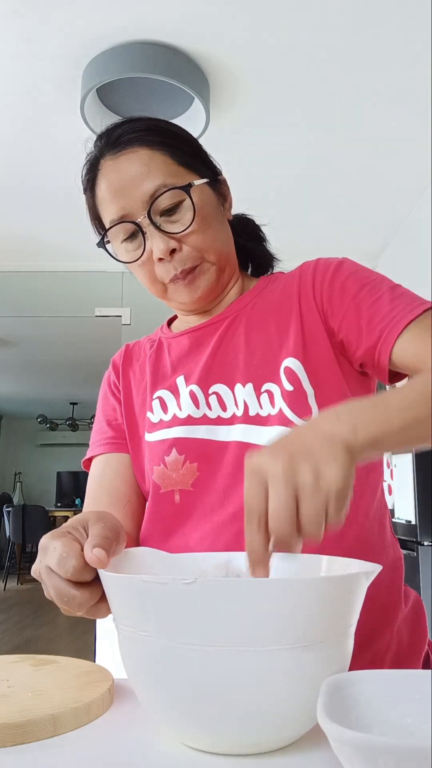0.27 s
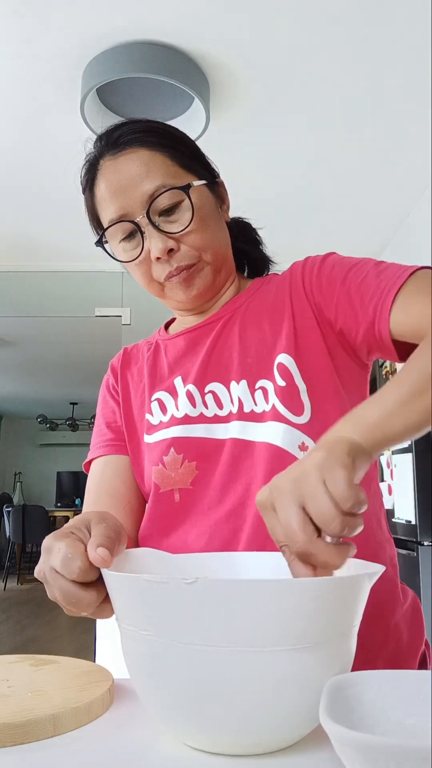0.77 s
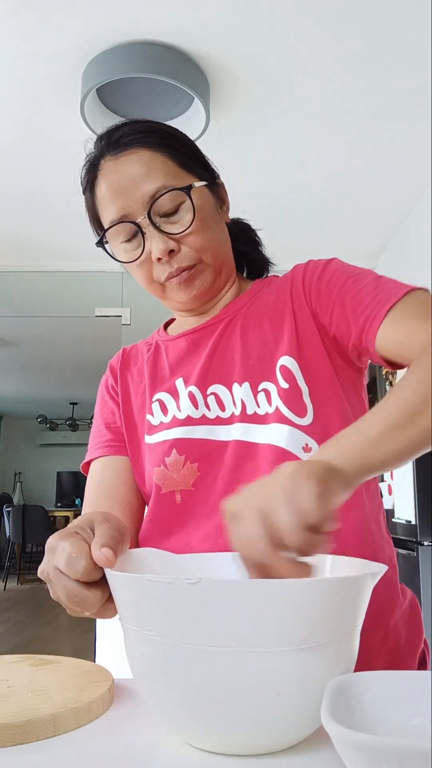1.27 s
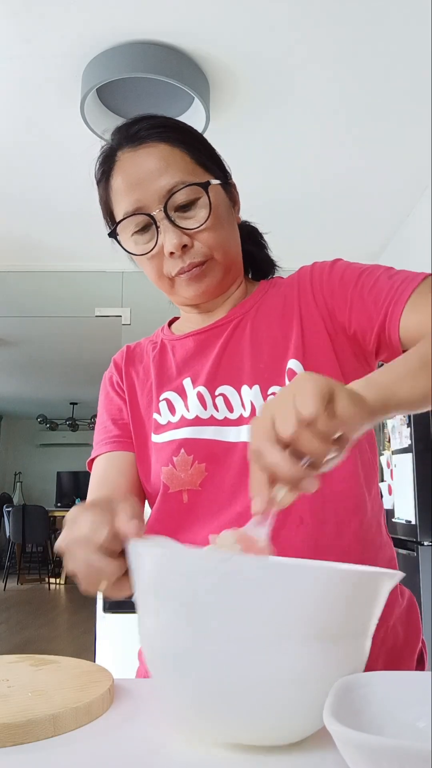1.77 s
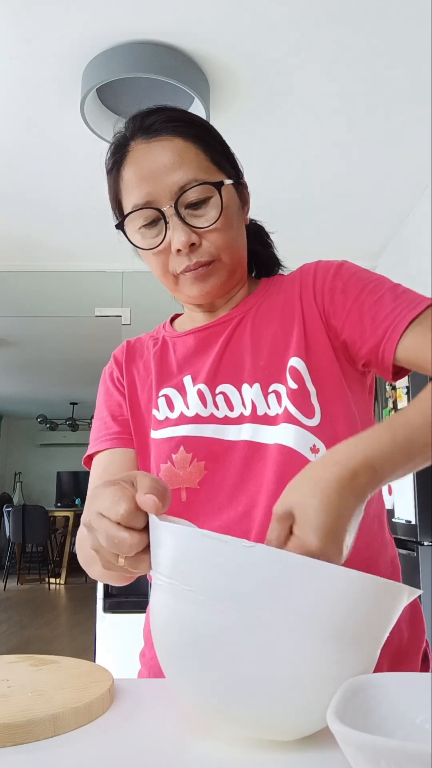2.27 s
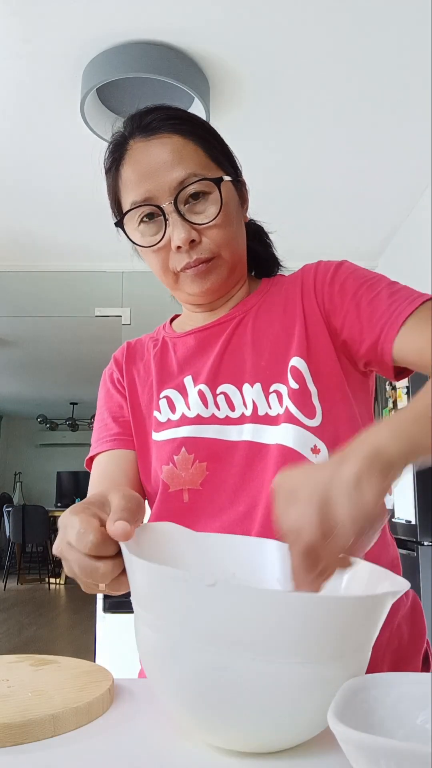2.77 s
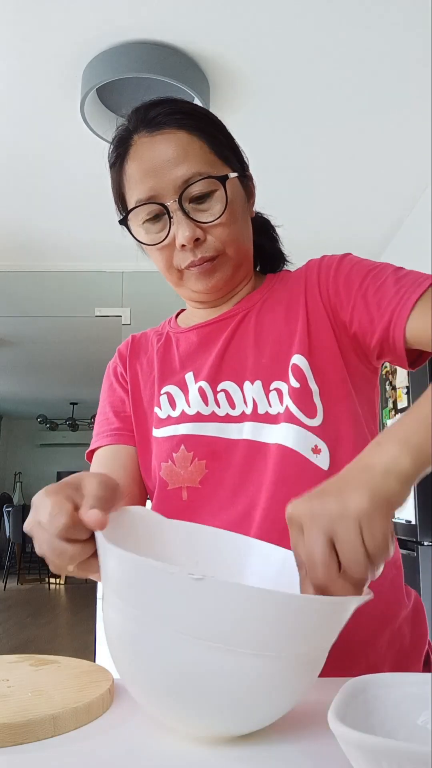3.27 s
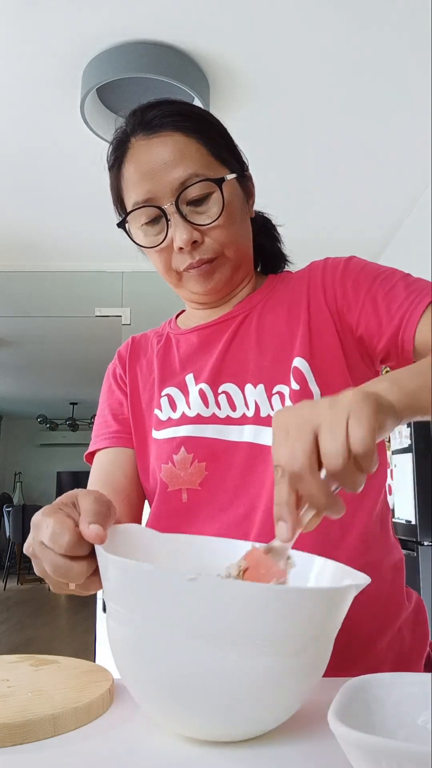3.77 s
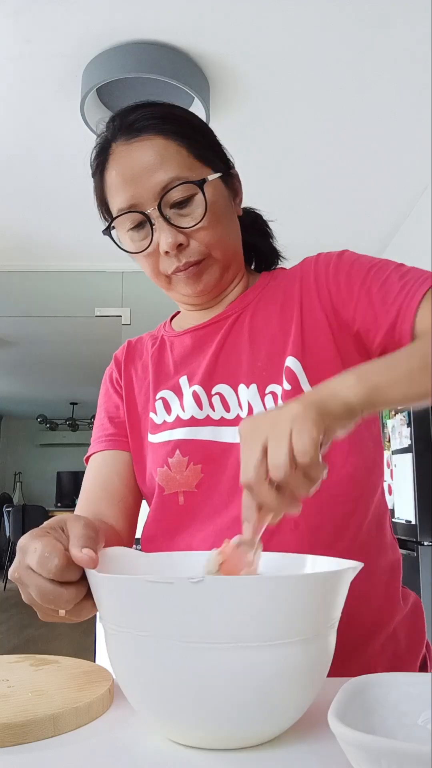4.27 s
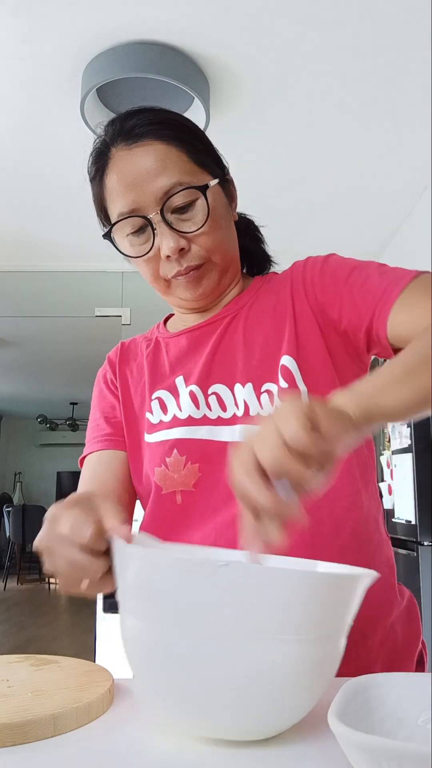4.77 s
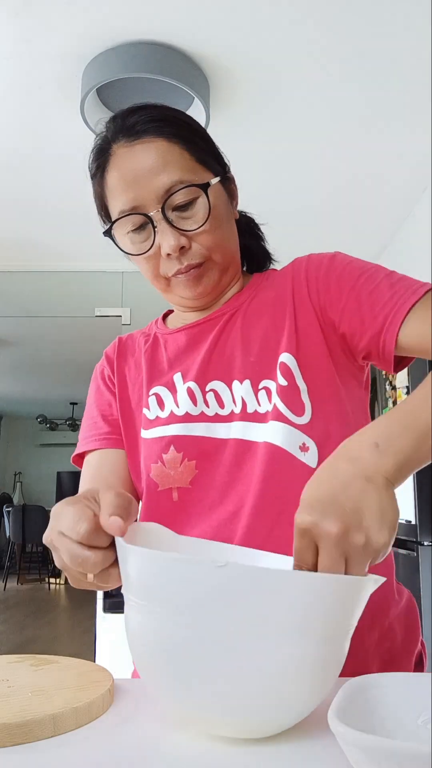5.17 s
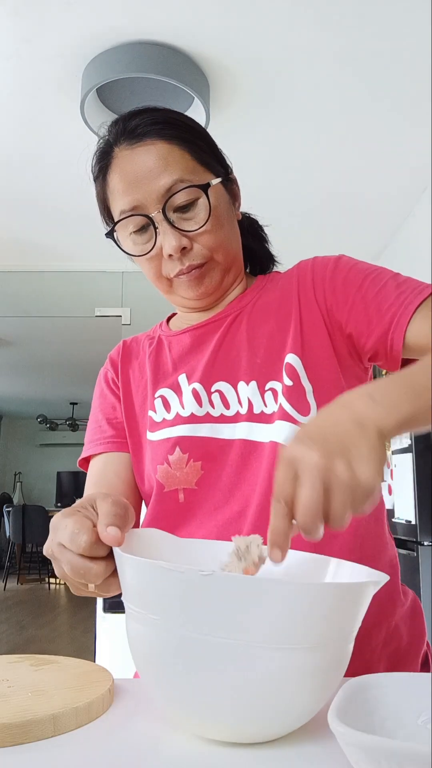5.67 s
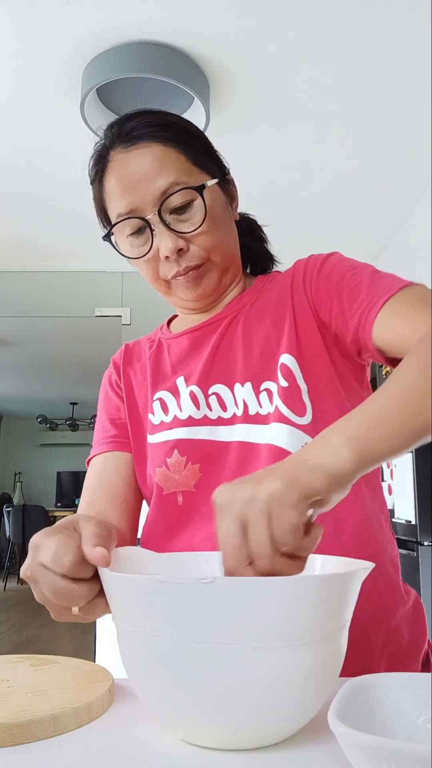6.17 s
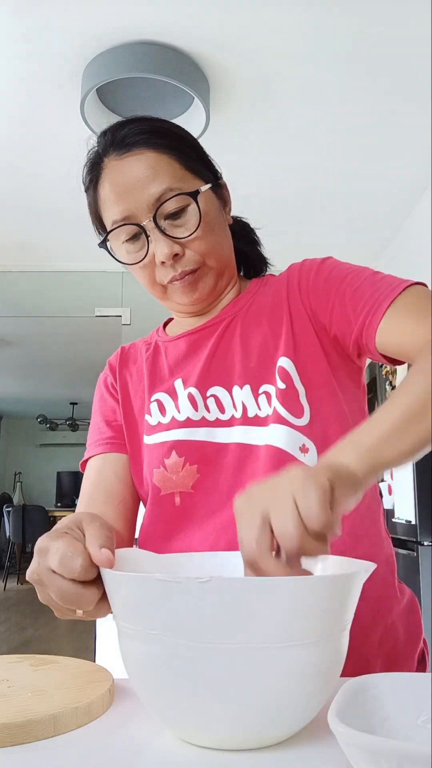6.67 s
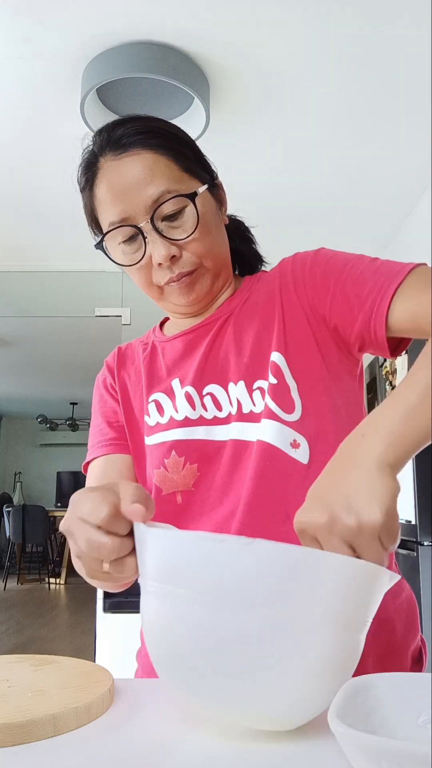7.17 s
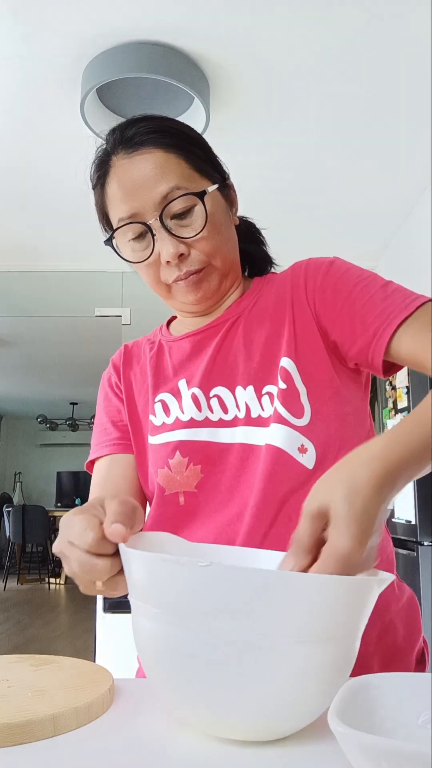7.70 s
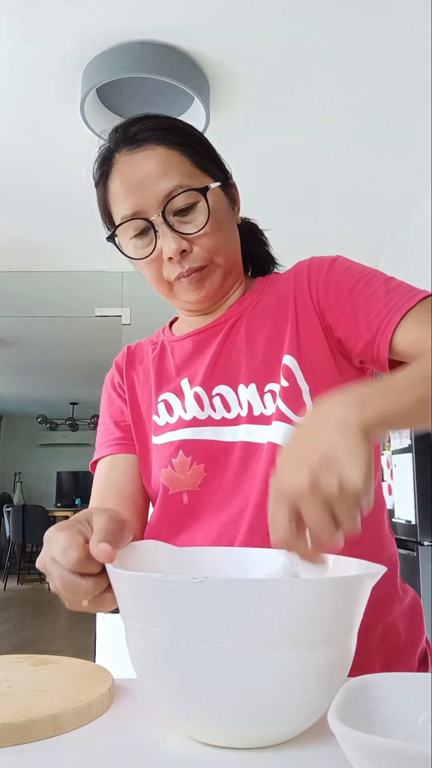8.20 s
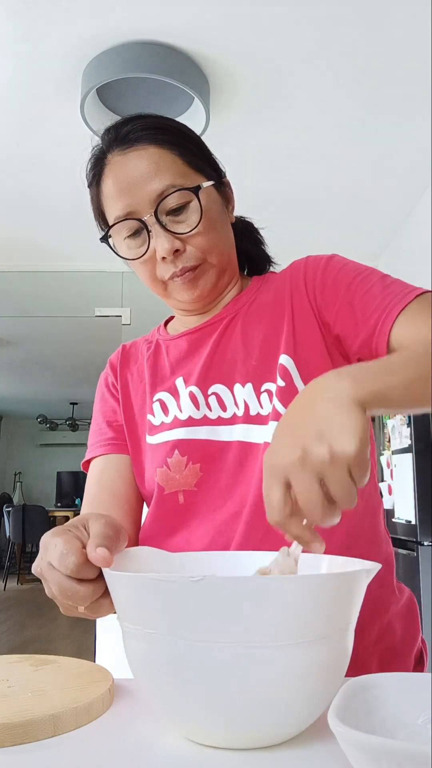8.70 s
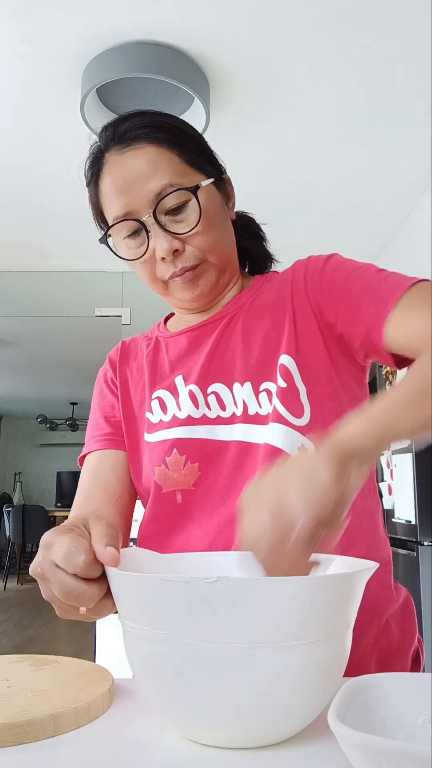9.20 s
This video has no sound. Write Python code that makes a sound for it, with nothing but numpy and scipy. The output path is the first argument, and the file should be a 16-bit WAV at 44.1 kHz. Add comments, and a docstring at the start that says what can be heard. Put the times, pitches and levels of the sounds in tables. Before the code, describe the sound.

A blade drags stiff, crumbly dough along a plastic bowl from the very start, in short gritty scrapes with a crisp hiss. Sharp hollow taps and a few dull thuds punctuate the strokes, while the bowl shifts with low murmurs on the counter. Tiny faint squeaks appear later. A low appliance hum continues under it all. Close stereo microphone, small kitchen with a short tail.

```python
"""A spatula stirs stiff, crumbly dough in a plastic bowl on a kitchen counter, close to a two-port microphone.
Throughout, an appliance hums in sine tones over faint filtered-noise air; the bowl's shifts murmur from the start.
The first stroke comes at once: each is a dense rush of tiny random slips that ring the bowl wall.
Sharp taps soon join, then dull thuds, both short rings of the wall; from about 3 s brief noise squeaks appear.
The stirring goes on past 9 s, and random echoes with a short kitchen tail follow strokes, taps and thuds."""
import sys
import numpy as np
from scipy import signal
from scipy.fft import rfft, irfft, next_fast_len
from scipy.io import wavfile
from scipy.ndimage import uniform_filter1d, minimum_filter1d, map_coordinates

SR = 44100
rng = np.random.default_rng(int(sys.argv[2]) if len(sys.argv) > 2 else 0)


def master(y):
    """Save y as 16-bit WAV."""
    cut = np.clip(np.atleast_2d(y).T, -1, 1)
    pcm = np.round(cut * 32767)  # scale
    wavfile.write(sys.argv[1], SR, pcm.astype(np.int16))


N = 416304  # length in samples

# Steady tones of the appliance. Each row: pitch in Hz, middle level in dB.
HUM_TONES = [(59.9, -48), (119.9, -45.5), (199.6, -55), (240, -71.5)]
# Resonances of the low murmur. Each row: pitch in Hz, width in Hz, level in dB.
COUNTER_RESONANCES = [(78, 30, -20.5), (116, 11, 5), (175, 99, -1.5), (195, 11, 1.5), (243.6, 11, 6.5),
                      (311, 55, -8.5)]
# The bowl shifts on the counter. Each row: middle in seconds, half length in seconds, level in dB.
BOWL_SHIFTS = [(0.31, 0.093, -38.5), (0.66, 0.046, -37), (1.05, .06, -38), (1.43, 0.1, -41),
               (1.8, 0.056, -39), (2.19, 0.16, -42.5), (2.66, 0.073, -39), (2.89, 0.053, -39),
               (3.3, 0.075, -41), (3.6, 0.12, -42), (4.41, 0.033, -47.5), (5.02, 0.074, -39.5),
               (5.58, 0.04, -46), (5.89, 0.094, -42.5), (6.39, .06, -46), (6.82, 0.27, -48.5),
               (7.22, 0.023, -39.5), (7.7, 0.18, -46.5), (9.14, 0.056, -46)]
# Tone colours of the steady rumble and the air. Each row: frequency in Hz, relative level in dB.
RUMBLE_COLOUR = [(15, -25), (40, 0), (70, -10), (120, 7), (200, -4), (280, -23.5), (500, -60)]
AIR_COLOUR = [(200, -20), (300, -1.5), (480, -7.5), (700, -11), (1000, -19), (2000, -23.5), (4000, -31.5),
              (10000, -35.5), (15000, -51.5)]

# Dough and bowl thud down. Each row: start in seconds, peak before echoes in dB, depth in dB,
# hollow knock in dB, rebound in dB relative to the first landing.
THUD_EVENTS = [(0.623, -17.5, -1, 5, -5.5), (0.993, -27, -28, -7.5, -23), (1.373, -28, -7, 3, 3.5),
               (1.672, -1.5, -13.5, 6.5, -18), (2.599, -25, -14, -7, -4), (3.162, -27.5, 18, -22.5, -0.5),
               (3.9145, -11, 13, 1.5, -13), (4.608, -29.5, 15.5, -10, -7), (5.951, -20.5, 10.5, -2, -8.5)]
# The blade chatters in a squeak. Each row: middle in seconds, half length in seconds, pitch in Hz,
# level in dB before its swell.
SQUEAK_EVENTS = [(3.273, 0.017, 2570, -37.5), (3.415, 0.021, 805, -56.5), (4.319, 0.026, 4080, -51),
                 (5.192, 0.031, 2710, -58), (5.27, .03, 2970, -62), (5.415, 0.02, 2640, -53.5),
                 (6.386, 0.011, 4370, -47), (7.576, 0.022, 2740, -42.5), (8.091, 0.017, 1310, -60.5),
                 (8.396, 0.017, 756, -50)]
# The spatula taps the bowl. Each row: start in seconds, peak before echoes in dB, body in dB, edge in dB,
# frequency of the brightest band in Hz.
TAP_EVENTS = [(0.1434, -14.5, -1, -28, 1850), (0.2358, -4.5, 9, 1.5, 1880), (0.2627, -2, -0.5, 6.5, 2850),
              (0.5293, -18, 14.5, -25.5, 2650), (0.9565, -19.5, 17.5, 11.5, 1670),
              (0.9927, -25, 17.5, -16, 1640), (1.3755, -31.5, -1, 1, 1580), (1.6413, -26.5, 4, 10, 1922),
              (2.069, -19, 0, 27.5, 1180), (2.2794, -29.5, -4, 13.5, 1790), (2.4213, -7, -27.5, 9, 1890),
              (2.4267, -6, -34, 3.5, 3800), (2.5016, -25.5, -14.5, 3.5, 2140),
              (2.5975, -18.5, 8, 6.5, 1650), (2.992, -18, -28, 5, 2570), (3.493, -8, -0.5, -8, 1980),
              (3.5851, -15.5, 0, -1.5, 1590), (3.6627, -5.5, 8.5, -4.5, 1640), (3.707, -6, 1.5, -1, 2630),
              (3.9443, -22, 4, 2.5, 3200), (4.071, -22, 10.5, -34, 1550), (4.103, -14.5, -1.5, 5, 2570),
              (5.5718, -27, 10, 4.5, 2950), (5.5996, -21.5, -2.5, 15, 2980), (5.7877, 1, -4.5, 4.5, 3250),
              (6.152, -30.5, 12, -10, 2210), (6.2303, -30.5, -11, -18.5, 2580),
              (6.3115, -23.5, -24, -2.5, 2020), (6.8883, -18, 5, 6, 1580), (7.5462, -20.5, 2, -1.5, 2920),
              (7.673, -26, -35, 7, 1880), (7.7237, -14.5, -30, 0.5, 3020)]
# Strokes of the blade along the wall. Each row: start in seconds, attack in seconds, length in seconds,
# scrape level in dB, crumb hiss level in dB, scrape's fade over the stroke in dB.
BLADE_STROKES = [(0.0, 0.0033, 0.13, -39, -42.5, 5), (0.272, 0.092, 0.21, -41, -45, 2),
                 (0.538, 0.051, 0.19, -39, -46.5, 1), (0.775, 0.031, 0.081, -40, -45, 0.5),
                 (0.922, .025, 0.068, -46, -54, 0.5), (0.999, .055, 0.23, -38, -44, 5),
                 (1.363, .03, 0.042, -53, -65, 8.5), (1.631, 0.047, 0.08, -33, -35, 2),
                 (1.715, .04, 0.5, -41, -43, 5), (2.603, 0.072, 0.072, -42, -48.5, 4),
                 (2.985, .045, 0.12, -43, -40, 0), (3.088, .05, 0.19, -36.5, -40, 5.5),
                 (3.397, 0.011, 0.043, -60, -68.5, 4), (3.501, .02, 0.072, -48.5, -67.5, 2.5),
                 (3.682, 0.061, 0.17, -39.5, -42.5, 2.5), (3.915, .03, .09, -48.5, -64.5, 3),
                 (4.097, 0.021, 0.052, -32.5, -44, 4), (4.195, 0.11, 0.11, -45.5, -57.5, -1.5),
                 (4.603, 0.026, 0.35, -40.5, -41, 1.5), (4.936, 0.04, 0.19, -44, -49, 5),
                 (5.16, .04, 0.12, -59, -66, 0), (5.364, 0.038, 0.057, -60.5, -65.5, 3.5),
                 (5.589, 0.033, 0.041, -37, -58, 4), (5.781, .04, 0.17, -38.5, -41.5, 2),
                 (6.139, .02, 0.31, -54.5, -60.5, 3.5), (6.333, 0.17, 0.11, -40, -53.5, 1),
                 (6.718, .13, 0.83, -36, -37, 9), (7.799, 0.026, 0.04, -34, -42.5, 1),
                 (7.893, .03, 0.1, -50.5, -62, 2), (8.219, 0.076, .08, -49, -58.5, 4.5),
                 (8.362, .03, .05, -65, -68, 2.5), (8.925, .012, 0.029, -52.5, -52.5, 0.5),
                 (8.977, 0.031, 0.31, -35.5, -35.5, 11.5), (9.392, 0.032, 0.038, -56, -65.5, 2)]
# The blade presses a lump of dough on the wall. Each row: middle in seconds, half length in seconds, level in dB.
DOUGH_FOLDS = [(0.03, 0.073, -46), (0.33, 0.013, -45.5), (0.63, 0.05, -38), (0.72, 0.061, -46.5),
               (1.0, 0.054, -47), (1.09, 0.1, -46), (1.425, 0.024, -51.5), (1.705, .03, -39.5),
               (1.93, 0.15, -53.5), (2.13, 0.084, -52.5), (2.665, 0.017, -41), (3.17, 0.038, -48.5),
               (3.27, 0.024, -48), (3.75, .02, -50), (3.985, .03, -50.5), (4.15, 0.015, -40.5),
               (4.325, 0.035, -45), (4.81, 0.045, -47), (5.03, 0.11, -55), (6.18, 0.017, -51.5),
               (6.28, 0.041, -50.5), (6.415, 0.032, -46.5), (6.905, 0.034, -40), (7.05, 0.15, -45),
               (7.31, 0.041, -47.5), (7.72, 0.014, -47), (7.86, 0.021, -54), (8.3, 0.026, -63),
               (9.015, .015, -33), (9.065, 0.041, -41.5), (9.19, 0.094, -50.5)]

# Ways the bowl wall rings. Each row: pitch in Hz, width in Hz, lift in dB for a pressed wall.
BOWL_MODES = [(120.5, 12, 6.5), (410, 5, 6.5), (512, 20, 4.5), (600, 6, 4.5), (635, 4.2, 8), (889, 5.8, 5),
              (1125, 8.1, 6.5), (1173, 16, 7), (1278, 93, 7), (1601, 42, 5.5), (1700, 170, 4),
              (2022, 19, 7.5), (2630, 160, 3), (2930, 25, 4), (3176, 8.3, 3.5), (3916, 19, 1)]
# Tone colours of the contacts, before the bowl's ringing. Each row: frequency in Hz, relative level in dB.
SCRAPE_COLOUR = [(800, -37.5), (1400, -10.5), (1900, 1.5), (2300, 0.5), (2800, 1.5), (4400, -2), (5400, -9),
                 (7000, -40.5)]
BODY_COLOUR = [(200, -22), (330, -2), (480, -8.5), (700, 8), (850, 11.5), (1030, -3), (1350, 1.5),
               (1800, -4), (2600, -39)]
HISS_COLOUR = [(4200, -27.5), (5600, -1.5), (6800, -2), (8000, -6), (10400, -3.5), (11500, -14),
               (13000, -20.5), (15500, -28.5)]
TAP_COLOUR = [(150, -32), (420, -17.5), (650, -2), (1000, 0), (1400, -4), (1800, 3.5), (3000, 1.5),
              (4200, -0.5), (5500, -9.5), (10000, -18.5), (12000, -30.5), (15000, -51)]
THUD_COLOUR = [(20, -19), (50, -1), (130, 0), (200, 0.5), (300, -8.5), (430, -19), (540, -11.5),
               (780, -4.5), (1200, -23), (2000, -23), (3000, -50.5), (8000, -62)]
# How the two ports differ. Each row: frequency in Hz, left minus right in dB.
PORT_DIFFERENCE = [(60, 9), (110, 7), (200, 9.5), (380, 10), (700, 4), (1290, 7), (2380, 5.5), (4400, 1.5),
                   (8120, -0.5), (15000, -39.5)]
# The kitchen's tail. Each row: frequency in Hz, time to fall by 60 dB in seconds.
KITCHEN_DECAY = [(100, 0.24), (600, 0.33), (3000, 0.48), (7000, 0.44), (14000, 0.16)]

TOP_HZ = 15750  # upper limit of the finished sound
LAG_MS = 0.73  # the left port hears sound this much later
MURMUR_REST_DB, MURMUR_WAVER_DB = -56.5, 3  # the murmur between shifts
REBOUND_S = 0.028  # the bowl rocks back and lands a second time
REBOUND_KNOCK_DB = -6  # the second landing has less hollow knock
THUD_LEFT_DB = 2  # the bowl's foot is nearer the left port
DRAG_DB = -16.5  # dough body that every stroke carries, relative to its scrape
RELEASE_DB_PER_S, HISS_RELEASE_DB_PER_S = 215, 209.5  # dying away as the blade leaves the wall
HISS_FADE = 1.83  # the crumbs fade this many times as far in dB as the scrape
HISS_BITE = 0.8  # the crumbs break loose within this share of a stroke's attack


def amp(db):
    """Turn decibels into a gain."""
    return 10 ** (np.asarray(db) / 20)


def unit(x):
    """Scale to an average (rms) level of 1."""
    return x / np.sqrt(np.mean(x ** 2) + 1e-20)


def along(points, hz):
    """Read a value between (Hz, value) points, with frequency on a log axis."""
    f, v = np.transpose(points)
    return np.interp(np.log(hz + 1), np.log(f), v)


def wobble(rate):
    """Draw a smooth random curve through this many random points a second."""
    knots = rng.standard_normal(int(N * rate / SR) + 4)
    return map_coordinates(knots, [np.arange(N) * rate / SR])


def filtered(x, response):
    """Multiply the spectrum of x by a response to frequency."""
    m = next_fast_len(x.shape[-1] + SR // 4)
    hz = np.fft.rfftfreq(m, 1 / SR)
    return irfft(rfft(x, m) * response(hz), m)[..., :x.shape[-1]]


def add(track, s, sound):
    """Mix a sound into a track at time s in seconds."""
    part = track[:, max(round(s * SR), 0):][:, :sound.shape[-1]]
    part += sound[:, :part.shape[-1]]


def swells(rows):
    """Add up the power of bell-shaped pushes."""
    t = np.arange(N) / SR
    return sum(amp(db) ** 2 * np.exp(-np.minimum(((t - s) / half) ** 2, 20)) for s, half, db in rows)


def ports(x):
    """The left port hears more bass, the right port more of the highest treble."""
    def gains(hz):
        pair = amp(np.outer([.5, -.5], along(PORT_DIFFERENCE, hz)))
        return pair / np.sqrt(np.mean(pair ** 2, axis=0))
    return filtered(x, gains)


def paths(near_db, near_t60, room_db):
    """Direct sound (right port first), quick echoes in bowl and counter, and the kitchen's tail."""
    t = np.arange(SR // 3) / SR
    lag = round(LAG_MS * SR / 1000)

    def norm(v):
        return v / np.linalg.norm(v, axis=1, keepdims=True)
    near = rng.standard_normal((2, len(t))) * amp(-60 * t / near_t60) * (t > LAG_MS / 1000)
    # each frequency of the tail dies away at its own pace
    hz, when, z = signal.stft(rng.standard_normal((2, len(t))), SR, nperseg=256)
    decay = amp(-60 * when / along(KITCHEN_DECAY, hz)[:, None])
    tail = signal.istft(z * decay, SR, nperseg=256)[1][:, :len(t)]
    tail = tail * (1 - np.exp(-t / 0.0018))  # the tail builds up over a few milliseconds
    h = amp(near_db) * norm(near) + amp(room_db) * norm(tail)
    h[0, lag] += 1
    h[1, 0] += 1
    return h


def bowl_ring(*colours, freedom=1, size=8192):
    """The wall's answer to one contact of the given colours; a free wall rings more than a pressed one."""
    hz = np.fft.rfftfreq(size, 1 / SR)
    modes = 1 + sum((amp(db) - 1) / np.hypot(1, 2 * (hz - f) / width) ** 2 for f, width, db in BOWL_MODES)
    gain = np.abs(modes) ** freedom * amp(sum(along(c, hz) for c in colours))
    # fold the cepstrum (spectrum of the log gain) so that the ring starts at once and only decays after it
    cepstrum = irfft(np.log(gain + 1e-6))
    cepstrum[1:size // 2] *= 2
    cepstrum[size // 2 + 1:] = 0
    return irfft(np.exp(rfft(cepstrum)))


def appliance_hum():
    """Sine tones hum steadily while their levels and phases waver a little."""
    t = np.arange(N) / SR
    hum = np.zeros(N)
    for hz, db in HUM_TONES:
        level = amp(db + 2.0 * wobble(9.3)) * np.sqrt(2)
        hum += level * np.sin(2 * np.pi * (hz * t + rng.random()) + 0.053 * wobble(1.0))
    return hum


def port_noise(response, apart):
    """Shared noise plus separate noise for each port; a larger apart makes the ports less alike."""
    shared = rng.standard_normal(N)
    return unit(filtered(shared + apart * rng.standard_normal((2, N)), response))


def counter_murmur():
    """The bowl's shifts swell a low noise that is coloured by the murmur's resonances."""
    def counter(hz):
        return sum(amp(db) / (1 + (2.04 * (hz - f) / width) ** 2) for f, width, db in COUNTER_RESONANCES)
    rest = amp(MURMUR_REST_DB + MURMUR_WAVER_DB * wobble(6))
    return np.sqrt(rest ** 2 + swells(BOWL_SHIFTS)) * port_noise(counter, apart=0.09)


def room_air():
    """Steady low rumble and faint air, both made of coloured noise."""
    rumble = amp(-50.0) * port_noise(lambda hz: amp(along(RUMBLE_COLOUR, hz)), apart=0.21)
    air = amp(-64.5) * port_noise(lambda hz: amp(along(AIR_COLOUR, hz)), apart=2.6)
    return rumble + air


def background():
    """Hum, murmur and room air, all reaching the left port slightly late."""
    def delay(hz):
        return np.exp(-2j * np.pi * np.outer([LAG_MS / 1000, 0], hz))
    return filtered(appliance_hum() + counter_murmur() + room_air(), delay)


def thuds():
    """Soft heavy contacts: dough drops and the bowl rocks on the counter."""
    out = np.zeros((2, N))
    landings = [row[:4] for row in THUD_EVENTS]
    for s, db, depth_db, knock_db, back_db in THUD_EVENTS:
        landings.append((s + REBOUND_S, db + back_db, depth_db, knock_db + REBOUND_KNOCK_DB))
    low_pass = signal.butter(2, 250, fs=SR, output="sos")
    for s, db, depth_db, knock_db in landings:
        ring = bowl_ring(THUD_COLOUR, [(90, depth_db), (250, 0), (700, knock_db)], freedom=1.28)
        ring *= amp(db) / np.abs(ring).max()
        # the deep push stays in the counter; the hollow knock carries into the kitchen
        push = signal.sosfilt(low_pass, ring)
        knock = ring - push
        push_paths = paths(near_db=-10, near_t60=0.082, room_db=-5.5)
        knock_paths = paths(near_db=2, near_t60=0.064, room_db=-4.5)
        add(out, s, signal.fftconvolve(push[None], push_paths, axes=1))
        add(out, s, signal.fftconvolve(knock[None], knock_paths, axes=1))
    return out * amp(THUD_LEFT_DB * np.array([[.5], [-.5]]))


def squeaks(sharpness=11):
    """Stick and slip briefly lock on to one rough pitch, made as a narrow band of noise."""
    out, t = np.zeros((2, N)), np.arange(SR // 4) / SR
    middle = t.mean()
    for s, half, hz, db in SQUEAK_EVENTS:
        noise = rng.standard_normal((2, len(t)))
        chatter = filtered(noise, lambda f: 1 / (1 + (sharpness * (f / hz - 1)) ** 2))
        swell = np.exp(-.5 * ((t - middle) / half) ** 2)
        add(out, s - middle, amp(db) * unit(chatter) * swell)
    return out


def taps(focus_db=9, focus_octaves=0.74):
    """Hard contacts: the point of contact sets the body, the edge and the brightest band of each."""
    out = np.zeros((2, N))
    for s, db, body_db, edge_db, hz in TAP_EVENTS:
        focus = [(hz / 2 ** focus_octaves, 0), (hz, focus_db), (hz * 2 ** focus_octaves, 0)]
        balance = [(800, body_db), (1700, 0.001), (3500, 0.0086), (6000, edge_db)]
        ring = bowl_ring(TAP_COLOUR, focus, balance)
        ring /= np.abs(ring).max()
        # the rim is in plain view of the microphone, so the direct crack is strong
        echoes = paths(near_db=-1, near_t60=.035, room_db=-4.5)
        add(out, s, amp(db) * signal.fftconvolve(ring[None], echoes, axes=1))
    return out


def friction(colour, rate, spread_db, room_db, patchy_db, size=4096):
    """Tiny slips of scattered size, about rate a second, ring the wall; the result has rms 1."""
    happens = rng.random(N) < rate / SR
    strength = rng.standard_normal(N) * amp(spread_db * np.clip(rng.standard_normal(N), -2, 2))
    rub = signal.fftconvolve(happens * strength, bowl_ring(colour))[:N]
    # the travelling contact favours now some resonances, now others
    z = signal.stft(rub, nperseg=1024)[2]
    field = uniform_filter1d(rng.standard_normal(z.shape), size=9, axis=0)
    field = uniform_filter1d(field, size=7, axis=1)
    rub = signal.istft(z * amp(patchy_db * unit(field)), nperseg=1024)[1][:N]
    rub = np.pad(rub, size)
    # hand and bowl keep moving, so each overlapping piece has its own echoes
    out = np.zeros((2, N + size))
    for start in range(0, N + size, size):
        piece = rub[start:start + 2 * size]
        piece = piece * np.hanning(2 * size)[:len(piece)] ** .5
        echoes = paths(near_db=9.0, near_t60=0.048, room_db=room_db)
        add(out, start / SR, signal.fftconvolve(piece[None], echoes, axes=1))
    return unit(out[:, size:])


def stroke(start, attack, length, fade_db, release_db_per_s):
    """Gain of one stroke: it bites, eases off along the wall and is released."""
    t = np.arange(N) / SR - start
    bite = np.clip(t / max(attack, 1 / SR), 0, 1)
    eased = np.clip((t - attack) / max(length - attack, 1 / SR), 0, 1)
    return bite * amp(-fade_db * eased - release_db_per_s * np.clip(t - length, 0, 1))


def stirring():
    """The blade drags dough along the wall, catching and letting go unevenly."""
    scrape_power, hiss_power = np.zeros(N), np.zeros(N)
    for s, attack, length, scrape_db, hiss_db, fade in BLADE_STROKES:
        scrape_gain = stroke(s, attack, length, fade, RELEASE_DB_PER_S)
        hiss_gain = stroke(s, HISS_BITE * attack, length, HISS_FADE * fade, HISS_RELEASE_DB_PER_S)
        scrape_power += (amp(scrape_db) * scrape_gain) ** 2
        hiss_power += (amp(hiss_db) * hiss_gain) ** 2
    body_power = amp(DRAG_DB) ** 2 * scrape_power + swells(DOUGH_FOLDS)
    # slow and fast unevenness of the grip, shared by all three layers
    grip_db = 0.63 * wobble(35) + .5 * wobble(130)
    scrape = friction(SCRAPE_COLOUR, rate=2500, spread_db=1.0, room_db=4.0, patchy_db=2.5)
    body = friction(BODY_COLOUR, rate=730, spread_db=3, room_db=0, patchy_db=3.0)
    crumbs = friction(HISS_COLOUR, rate=7000, spread_db=5.0, room_db=6.5, patchy_db=2.0)
    scrape *= np.sqrt(scrape_power) * amp(grip_db)
    body *= np.sqrt(body_power) * amp(grip_db)
    crumbs *= np.sqrt(hiss_power) * amp(0.43 * grip_db)
    return scrape + body + crumbs


def scene():
    """Everything as it reaches the two ports."""
    return ports(background() + thuds() + squeaks() + taps() + stirring())


def record(dry, ceiling=0.84):
    """A fast limiter holds down the sharpest knocks, then everything above the top frequency is removed."""
    needed = np.minimum(1, ceiling / (np.abs(dry).max(axis=0) + 1e-9))
    gain = uniform_filter1d(minimum_filter1d(needed, size=129), size=129)
    return filtered(dry * gain, lambda hz: hz < TOP_HZ)


dry = scene()
out = record(dry)
master(out)
```